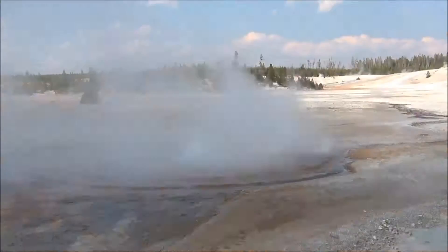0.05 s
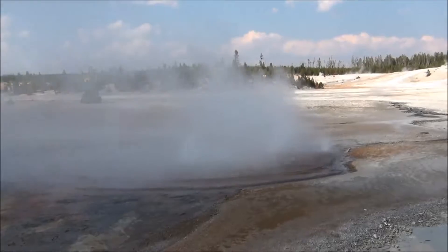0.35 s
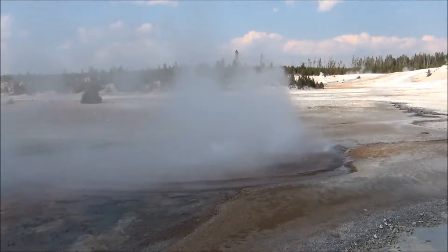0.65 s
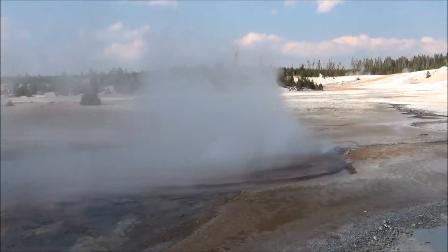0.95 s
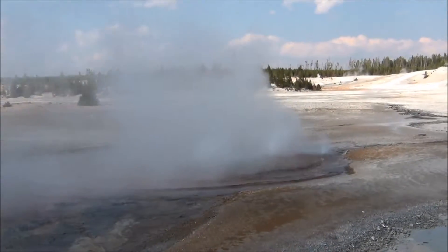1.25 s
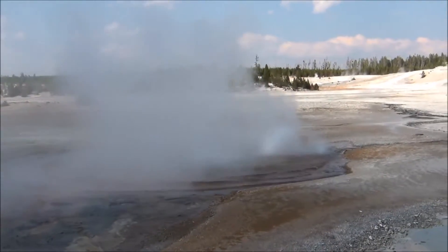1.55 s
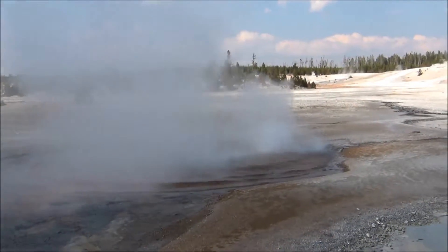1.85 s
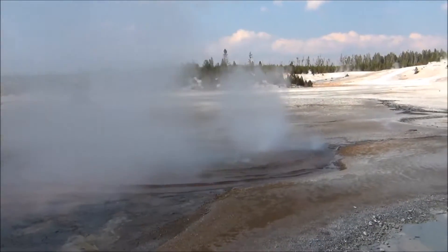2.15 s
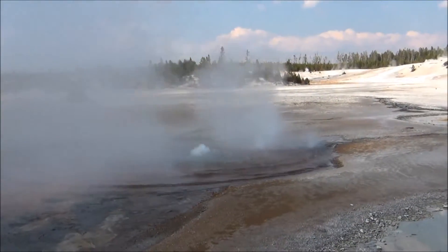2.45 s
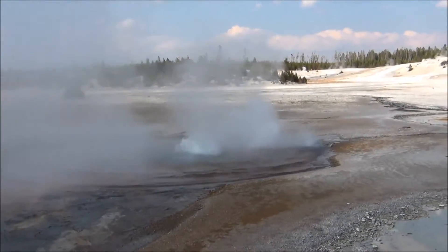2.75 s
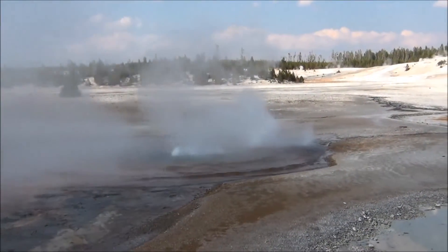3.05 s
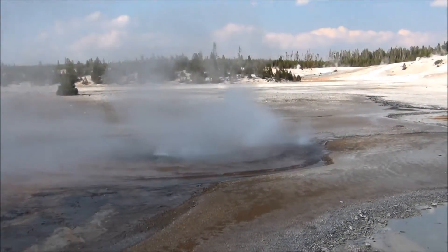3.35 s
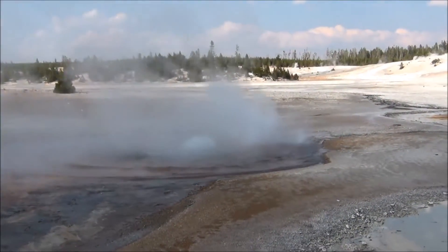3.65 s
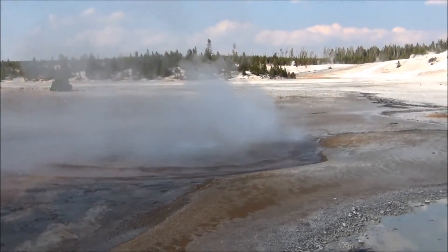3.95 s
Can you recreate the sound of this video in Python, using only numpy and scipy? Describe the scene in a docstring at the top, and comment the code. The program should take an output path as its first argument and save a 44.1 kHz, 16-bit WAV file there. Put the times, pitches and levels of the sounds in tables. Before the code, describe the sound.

Boiling water bubbles up through an open-air hot pool in quick splashing pulses, several each second. Steam pockets gulp as they close, while a light hiss of spray and sloshing continue throughout, with barely any wind.

```python
"""Boiling geyser pool

Steam breaks through an open-air pool seven or eight times a second in churning surges of bubbles.
Big pockets gulp as they close; spray falls back as a fizzing hiss over sloshing water and a little wind.
The sound is almost mono and cuts out for an instant just after the start."""
import sys
import numpy as np
from scipy import signal
from scipy.fft import rfft, irfft
from scipy.io import wavfile
from scipy.ndimage import uniform_filter1d

SR = 44100
rng = np.random.default_rng(int(sys.argv[2]) if len(sys.argv) > 2 else 0)


def generate_wav(signal):
    """Clip the signal to [-1, 1] and save it as 16-bit WAV at the path in sys.argv[1]."""
    frames = np.transpose(np.atleast_2d(signal))
    scaled = np.clip(frames, -1, 1) * 32767
    pcm = np.round(scaled).astype(np.int16)
    wavfile.write(sys.argv[1], SR, pcm)


N = 176400
T = np.arange(N) / SR

# fader ride of the falling spray: t/s, level/dB
SPRAY_RIDE = [(0, -31.5), (.045, -33), (.07, -38.5), (.19, -35), (.32, -39), (.47, -39.5), (.59, -37.5),
              (.77, -39), (.805, -35), (.86, -47.5), (1.15, -46.5), (1.8, -43), (1.99, -44.5), (2.04, -42),
              (2.28, -45.5), (2.52, -45), (2.7, -41), (2.86, -40.5), (2.97, -37.5), (3.11, -40),
              (3.16, -45.5), (3.45, -41.5), (3.66, -45), (3.88, -41), (4, -41)]
# fizz of the spray: f/Hz, level/dB
SPRAY_EQ = [(100, -5), (300, -5), (700, 6), (1200, 9), (2000, 8), (2500, 6.5), (3200, 3), (4000, 3.5),
            (6000, 2), (8500, -0.5), (12300, -6), (13500, -12.5), (16000, -17)]
# fader ride of the sloshing water: t/s, level/dB
SLOSH_RIDE = [(.07, -28), (.57, -29.5), (.73, -28), (.89, -36), (1.03, -33), (1.2, -34.5), (1.36, -34.5),
              (1.65, -34.5), (1.81, -32.5), (1.96, -38.5), (2.08, -36.5), (2.24, -39.5), (2.37, -35),
              (2.62, -36), (2.77, -34), (2.92, -28), (3.03, -29), (3.2, -35), (3.33, -31.5), (3.47, -32),
              (3.63, -34), (3.78, -31), (4, -32.5)]
# tone of the slosh: f/Hz, level/dB
SLOSH_EQ = [(30, -32), (100, -11.5), (220, 0), (320, 0), (450, 3.5), (620, 2), (1200, -0.5), (2000, -3),
            (2500, -9), (3200, -10.5), (4200, -23), (16000, -37)]
# wind on the microphone: f/Hz, level/dB
WIND_EQ = [(15, -29), (35, -29), (65, -1), (120, 8), (300, 7), (1500, -30)]
# steam surges: start/s, crest/s, end/s, level/dB, opening/dB (against the crest), bass/dB, treble/dB,
# bubble resonance/Hz
SURGES = [(0.098, 0.133, 0.18, -33.5, -0.5, 0, -4.5, 755), (0.19, 0.244, 0.27, -33.5, 1, -0.5, -4.5, 720),
          (0.324, 0.401, 0.43, -29.5, -6.5, 0, -3, 700), (0.439, 0.516, 0.55, -28, -6, -4.5, -9.5, 605),
          (0.6, 0.667, 0.69, -25.5, -8, -3, -4, 765), (0.766, 0.814, 0.84, -25.5, -3, -8, -1.5, 734),
          (0.95, 0.98, 1.012, -33, -2.5, -4.5, 1, 700), (1.12, 1.148, 1.183, -27.5, -3, -12, -8.5, 750),
          (1.242, 1.284, 1.33, -26.5, -4, -10.5, -9, 730),
          (1.398, 1.422, 1.448, -30, 0.5, -11.5, -11.5, 774),
          (1.441, 1.463, 1.488, -29.5, -4.5, -7, -6, 710),
          (1.545, 1.575, 1.64, -28.5, -1.5, -6.5, -11, 590),
          (1.671, 1.725, 1.78, -30.5, -7, -5.5, -15, 840), (1.831, 1.877, 1.903, -25.5, -4, -7, -13, 583),
          (2.005, 2.011, 2.06, -31, -1, -4.5, -12, 764), (2.124, 2.151, 2.195, -29.5, -5, -5, -12.5, 690),
          (2.277, 2.322, 2.35, -27, -8.5, -7, -8.5, 800), (2.395, 2.46, 2.494, -31, -8, -1.5, -8, 570),
          (2.509, 2.56, 2.6, -31.5, -5.5, -0.5, -12, 610), (2.651, 2.703, 2.73, -25.5, -8, -5, -8.5, 730),
          (2.816, 2.865, 2.895, -30, -7.5, -7, -7, 634), (2.94, 2.965, 2.995, -27, -4, -5.5, -9, 590),
          (3.001, 3.022, 3.08, -37, 3, -14, 4.5, 1260), (3.045, 3.106, 3.13, -25.5, -13, -11, -8, 753),
          (3.228, 3.262, 3.28, -29.5, -1.5, -2.5, -10.5, 760),
          (3.366, 3.398, 3.434, -27, -1.5, -6.5, -9.5, 930), (3.519, 3.558, 3.608, -24.5, -7, -9, -14, 763),
          (3.664, 3.709, 3.755, -24, -3.5, -8.5, -13.5, 770),
          (3.815, 3.865, 3.904, -25.5, -2, -5.5, -7.5, 590), (3.92, 3.95, 3.93, -35, 0, -9, -6, 760),
          (3.976, 3.999, 4.08, -29.5, -6, -11, -12, 730)]
# churn of a surge before its own bass, treble and resonance: f/Hz, level/dB
CHURN_EQ = [(30, -49), (60, -19), (105, -14), (150, -3), (200, 5.5), (320, 8), (420, 5), (600, -1),
            (800, -1), (1250, -1.5), (1550, 0), (2000, 1), (2400, -5.5), (3200, -10.5), (4200, -18),
            (8000, -51.5), (16000, -50)]
# large steam pockets closing: t/s, level/dB, f/Hz
GULPS = [(0.128, -15.5, 347), (.164, -15, 261), (.243, -22, 322), (.388, -18, 260), (.403, -17.5, 340),
         (.523, -17.5, 578), (.652, -19, 320), (.662, -25.5, 1865), (0.672, -17, 329), (.812, -12, 781),
         (.823, -19.5, 1980), (0.976, -22.5, 2350), (1.143, -15, 760), (1.275, -20, 1060),
         (1.837, -18, 240), (1.862, -21, 225), (1.87, -19, 1263), (2.306, -18, 810), (2.319, -16, 787),
         (2.42, -25, 238), (2.477, -16.5, 455), (2.685, -16, 326), (2.691, -20, 695), (2.959, -22, 278),
         (3.057, -18.5, 249), (3.102, -21, 1226), (3.254, -19, 742), (3.546, -15, 247), (3.549, -19, 1103),
         (3.554, -14, 710), (3.701, -22, 740), (3.725, -13, 348), (3.83, -14, 865), (3.862, -13.5, 1600),
         (3.882, -13.5, 343)]
# close droplets and spits of spray: t/s, level/dB, f/Hz, decay/s
TICKS = [(0.166, -38, 11000, 0.058), (1.356, -38, 5150, 0.0033), (1.437, -40, 10500, .004),
         (1.806, -38, 10500, 0.0035), (2.026, -41, 9000, 0.0068)]
# colour that basin and ground give to all the water: f/Hz, level/dB
BASIN_EQ = [(270, 1), (330, 2), (400, -2.5), (455, 0.5), (510, -4.5), (580, 2.5), (650, 0.5), (750, 1.5),
            (900, -0.5), (1150, 2), (1500, 0), (1900, 1), (2700, -1), (3050, 2), (3700, -0.5), (5000, -0.5)]
# stereo side signal: f/Hz, level/dB
SIDE_EQ = [(150, -68), (350, -42), (700, -26), (1400, -25), (2800, -17), (6000, -33.5), (10000, -36.5),
           (14000, -54)]

SPRAY_DB, DROPS_PER_S, DROP_SPREAD_DB, SPRAY_FLUTTER_DB = -2.5, 20000, 3.5, .7
SLOSH_DB, SLOSH_PER_S, WIND_DB = -3.5, 2500, -64
SURGE_DB, END_DB, ATTACK_S, RELEASE_S = 1, -12, .005, 0.0052
BUBBLES_PER_S, BUBBLE_SPREAD_DB, RING_DB, RING_WIDTH_HZ = 3500, 2, 5.5, 36
BASS_HZ, BODY_LO_HZ, BODY_HI_HZ, TREBLE_HZ = 410, 572, 1216, 1820
BASS_LAG_S, SPIT_DB, SPIT_S, SPIT_LAG_S = 0.0054, 6.5, 0.0091, 0.001
PLOPS_PER_S, PLOP_DB, PLOP_CYCLES = 110, 6, 3.35
PLOP_LO_HZ, PLOP_HI_HZ, PLOP_RISE_PER_S = 564.5, 2105, 3
GULP_DB, GULP_RISE_S, GULP_DECAY_S, GULP_SAG_PER_S = -4.5, 0.0048, 0.01, 2.3
TICK_LOG_WIDTH = 0.23
ECHO_DB, ECHO_RISE_S, ECHO_DECAY_S = -25, 0.012, 0.019
DROPOUT_S, DROPOUT_DB = (0.051, 0.069), -32.5
LOW_CUT_HZ, HIGH_CUT_HZ = 47, 15750


def amp(db):
    """Decibels to gain."""
    return 10 ** (np.asarray(db) / 20)


def unit(x):
    """Normalises to rms 1."""
    return x / np.sqrt(np.mean(x ** 2) + 1e-20)


def bins():
    """Frequencies on which EQ curves are drawn."""
    return np.fft.rfftfreq(4096, 1 / SR)


def eq_curve(points):
    """Joins EQ points along a log-frequency axis, giving dB on bins()."""
    f, db = np.transpose(points)
    return np.interp(np.log(bins() + 1), np.log(f), db)


def colour(x, db):
    """Plays x through a minimum-phase EQ curve."""
    log_gain = np.log(amp(np.concatenate([db, db[-2:0:-1]])))
    response = np.fft.ifft(np.exp(np.conj(signal.hilbert(log_gain)))).real
    return signal.fftconvolve(x, response[:len(db)])[:len(x)]


def in_band(db, lo_hz, hi_hz):
    """Trims an EQ curve to pass unit power within one band."""
    f = bins()
    return db - 10 * np.log10(np.mean(amp(db) ** 2 * ((f > lo_hz) & (f < hi_hz))))


def add(mix, s, sound):
    """Mixes a sound in at time s."""
    part = mix[max(round(s * SR), 0):][:len(sound)]
    part += sound[:len(part)]


def drift(rate_hz):
    """Smooth random modulation of rms 1."""
    f = np.fft.rfftfreq(N, 1 / SR)
    return unit(irfft(rfft(rng.standard_normal(N)) * (f > 0) * np.exp(-(f / rate_hz) ** 2), N))


def pops(per_s, spread_db, size=N):
    """Random clicks, mostly soft, a few loud."""
    height = amp(spread_db * np.minimum(rng.exponential(1, size), 4.5))
    return unit(height * rng.choice([-1., 1.], size) * (rng.random(size) < per_s / SR))


def spray():
    """Fine drops patter back on the pool in clumps and blur into fizz."""
    level_db = SPRAY_DB + np.interp(T, *np.transpose(SPRAY_RIDE)) + SPRAY_FLUTTER_DB * drift(rate_hz=60)
    drops = pops(DROPS_PER_S, DROP_SPREAD_DB) * amp(level_db)
    return colour(drops, in_band(eq_curve(SPRAY_EQ), 4760, 15000))


def slosh():
    """A bed of small bubbles keeps the water busy between surges."""
    bubbles = pops(SLOSH_PER_S, spread_db=3.0) * amp(1.8 * drift(rate_hz=10))
    water = unit(colour(bubbles, eq_curve(SLOSH_EQ)))
    return water * amp(SLOSH_DB + np.interp(T, *np.transpose(SLOSH_RIDE)))


def wind():
    """Air on the microphone makes a faint, lumpy rumble."""
    gusts = amp(WIND_DB + 0.96 * drift(rate_hz=7.7))
    return gusts * unit(colour(rng.standard_normal(N), eq_curve(WIND_EQ)))


def ground_scatter(x):
    """Short, diffuse reflections off the open ground."""
    t = T[:SR // 4]
    tail = rng.standard_normal(len(t)) * np.exp(-t / ECHO_DECAY_S) * (1 - np.exp(-t / ECHO_RISE_S))
    return signal.fftconvolve(x, tail / np.linalg.norm(tail))[:N]


def surge(start, crest, end, level_db, opening_db, bass_db, treble_db, ring_hz):
    """Steam throws up a bubble cloud that spits at its crest and collapses; big bubbles land late."""
    f, t = bins(), start - ATTACK_S + T[:SR // 5]
    tilt = eq_curve([(BASS_HZ, bass_db), (BODY_LO_HZ, 0), (BODY_HI_HZ, 0), (TREBLE_HZ, treble_db)])
    resonance = RING_DB / (1 + ((f - ring_hz) / RING_WIDTH_HZ) ** 2)
    tone_db = eq_curve(CHURN_EQ) + tilt + resonance
    from_crest = np.interp(t, [start, crest, end], [-1, 0, 1])
    swell_db = np.where(from_crest < 0, opening_db * abs(from_crest) ** 1.4,
                        END_DB * abs(from_crest) ** 2.16)
    attack = np.clip((t - start) / ATTACK_S + 1, 0, 1)
    release = np.exp(-np.maximum(t - end, 0) / RELEASE_S)
    swell = amp(swell_db) * attack * release
    late_swell = np.interp(t - BASS_LAG_S, t, swell)
    spit = amp(SPIT_DB * (np.exp(-((t - crest - SPIT_LAG_S) / SPIT_S) ** 2) - .5))
    # three-way crossover: big bubbles carry the lows, small ones the highs
    lows = 1 / (1 + (f / BASS_HZ) ** 6)
    highs = 1 - 1 / (1 + (f / BODY_HI_HZ) ** 6)
    out = plops(swell, tone_db)
    for share, envelope in [(lows, late_swell), (1 - lows - highs, swell), (highs, swell * spit)]:
        bubbles = pops(BUBBLES_PER_S, BUBBLE_SPREAD_DB, size=len(t))
        band_db = in_band(tone_db, 490, 1610) + 10 * np.log10(np.maximum(share, 1e-4))
        out += colour(bubbles * envelope, band_db)
    return amp(SURGE_DB + level_db) * out


def plops(swell, tone_db):
    """Single bubbles ring out of a surge, each bending up a little in pitch."""
    out, age = np.zeros(len(swell)), T[:SR // 20]
    count = round(PLOPS_PER_S * len(swell) / SR)
    for when, register, strength in rng.random((count, 3)):
        at = int(when * len(swell))
        hz = PLOP_LO_HZ * (PLOP_HI_HZ / PLOP_LO_HZ) ** register
        chirp = np.sin(2 * np.pi * hz * age * (1 + PLOP_RISE_PER_S * age / 2))
        envelope = (1 - np.exp(-age * hz)) * np.exp(-age * hz / PLOP_CYCLES)
        gain = strength * swell[at] * amp(PLOP_DB + np.interp(hz, bins(), tone_db))
        add(out, at / SR, gain * envelope * chirp)
    return out


def gulp(level_db, pitch_hz):
    """A large steam pocket closes and rings briefly, sagging in pitch."""
    t = T[:SR // 10]
    hz = pitch_hz * np.exp(-GULP_SAG_PER_S * (t - GULP_DECAY_S))
    turns = np.cumsum(hz) / SR + rng.random()
    envelope = np.minimum(t / GULP_RISE_S, 1) * np.exp(-np.maximum(t - GULP_RISE_S, 0) / GULP_DECAY_S)
    return amp(GULP_DB + level_db) * envelope * np.sin(2 * np.pi * turns)


def droplet_tick(level_db, centre_hz, decay_s):
    """Droplets snap close by in a bright burst of noise."""
    t = T[:SR // 5]
    band_db = -10 * np.log10(1 + (np.log((bins() + 1) / centre_hz) / TICK_LOG_WIDTH) ** 4)
    return amp(level_db) * unit(colour(rng.standard_normal(len(t)), band_db)) * np.exp(-t / decay_s)


def scene():
    """The pool sits dead centre; ground reflections add a trace of width."""
    water = spray() + slosh()
    for start, *settings in SURGES:
        add(water, start - ATTACK_S, surge(start, *settings))
    for s, db, hz in GULPS:
        add(water, s, gulp(db, hz))
    for s, db, hz, decay_s in TICKS:
        add(water, s, droplet_tick(db, hz, decay_s))
    water = colour(water, eq_curve(BASIN_EQ))
    mid = water + amp(ECHO_DB) * ground_scatter(water) + wind()
    side = colour(ground_scatter(water), eq_curve(SIDE_EQ))
    return np.array([mid + side, mid - side])


def record(dry):
    """The microphone's low cut, a brief dropout, then a steep high cut."""
    thinned = signal.sosfilt(signal.butter(2, LOW_CUT_HZ, "high", fs=SR, output="sos"), dry)
    in_dropout = (T > DROPOUT_S[0]) & (T < DROPOUT_S[1])
    gain = uniform_filter1d(np.where(in_dropout, amp(DROPOUT_DB), 1), size=60)  # softened edges
    high_cut = signal.firwin(511, HIGH_CUT_HZ, window=("kaiser", 9), fs=SR)
    return signal.oaconvolve(thinned * gain, high_cut[None], "same", axes=1)


dry = scene()
out = record(dry)
generate_wav(out)
```